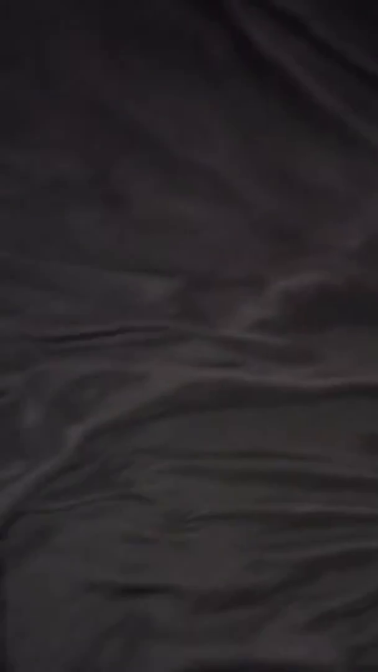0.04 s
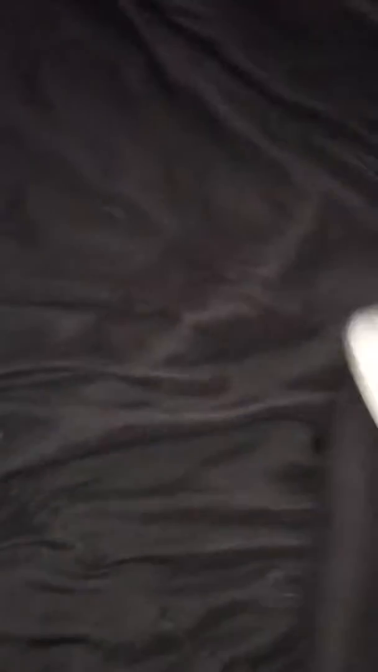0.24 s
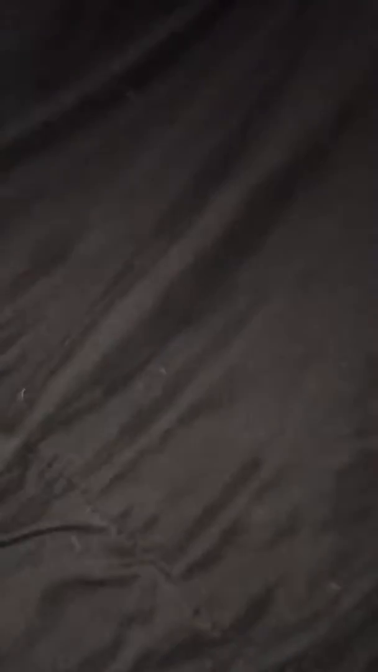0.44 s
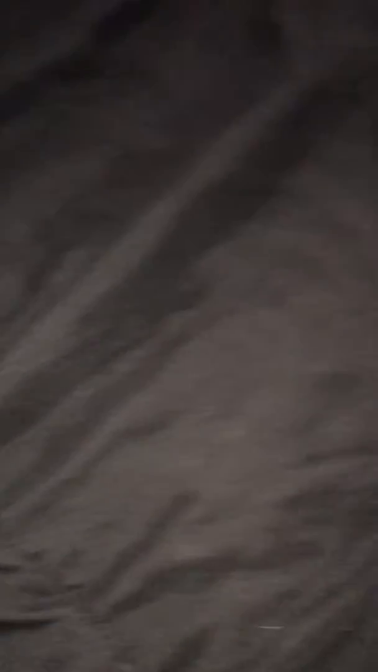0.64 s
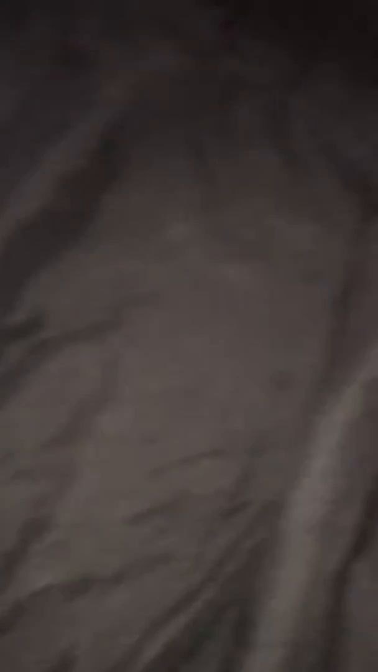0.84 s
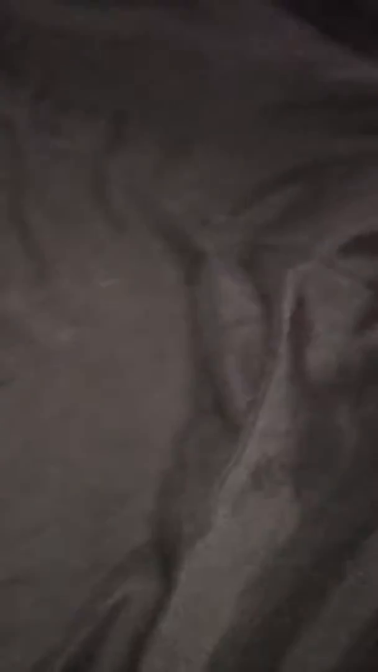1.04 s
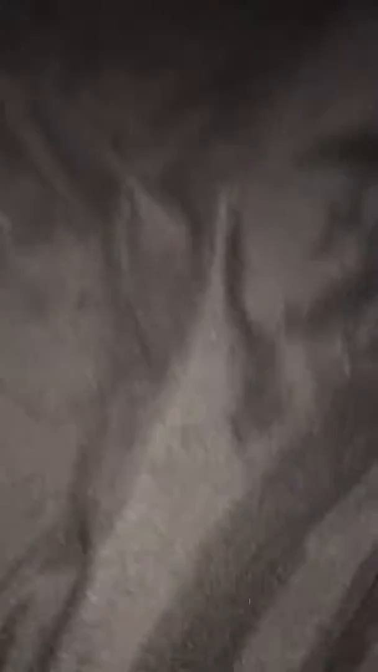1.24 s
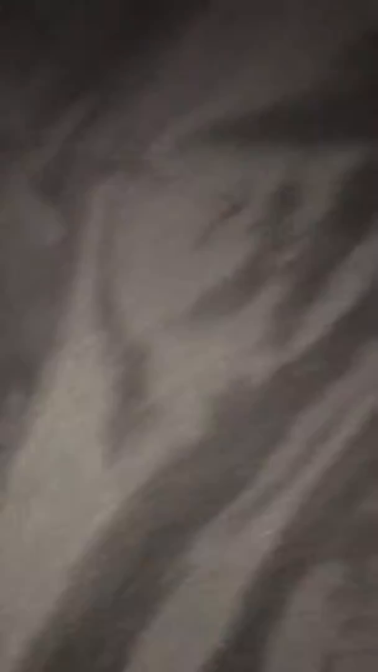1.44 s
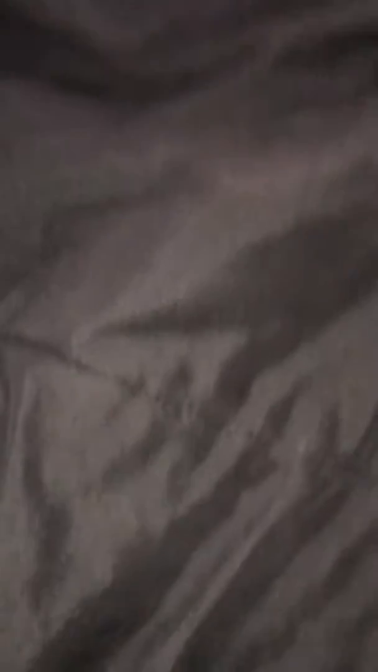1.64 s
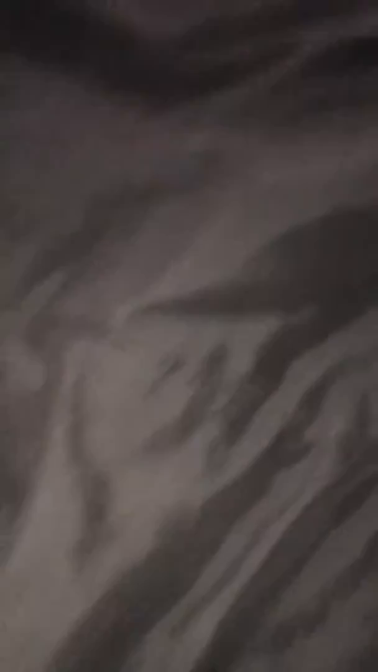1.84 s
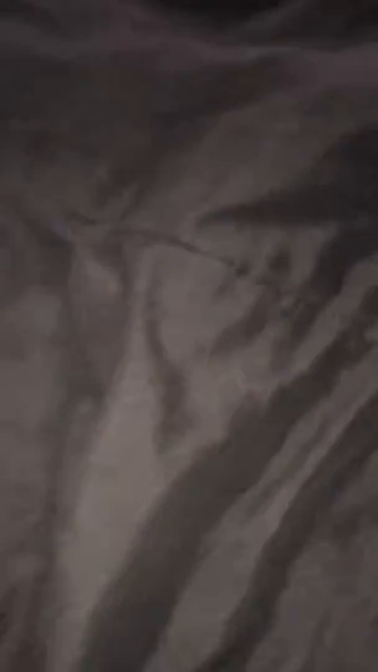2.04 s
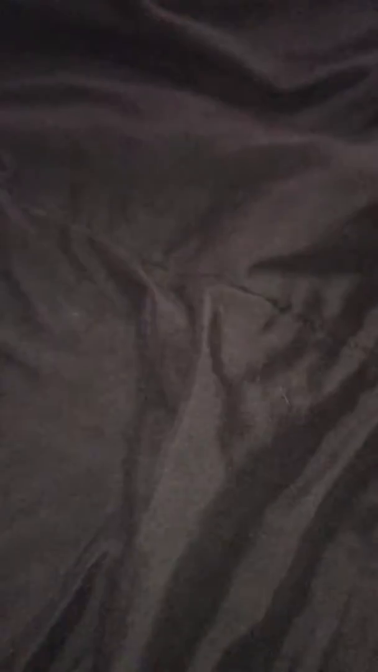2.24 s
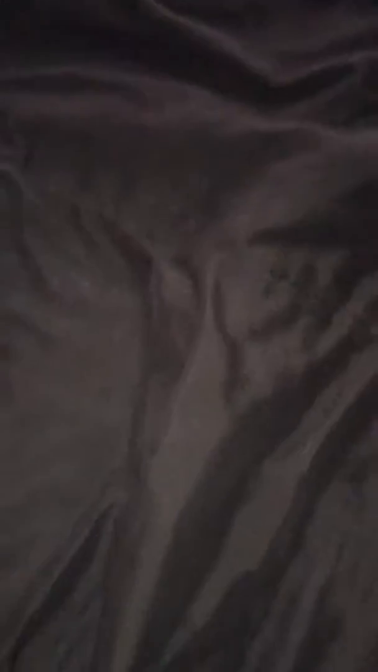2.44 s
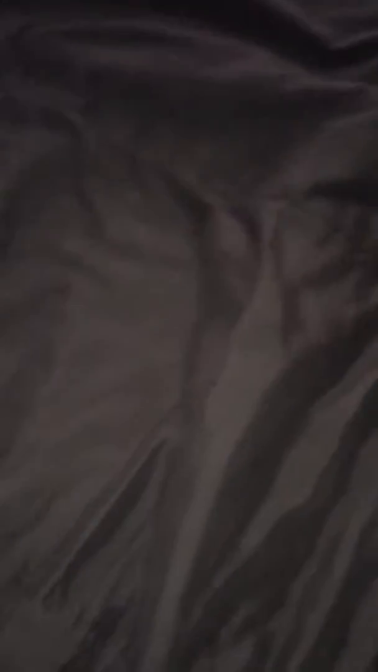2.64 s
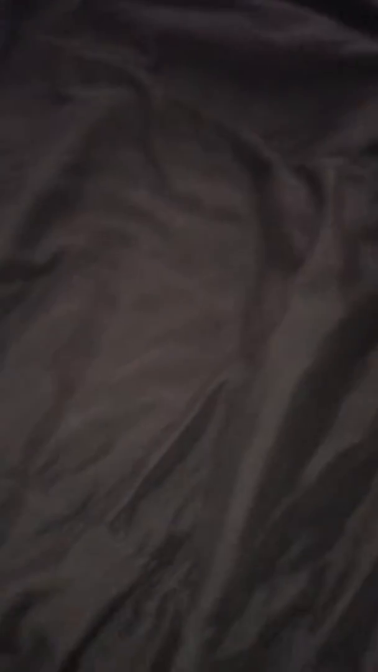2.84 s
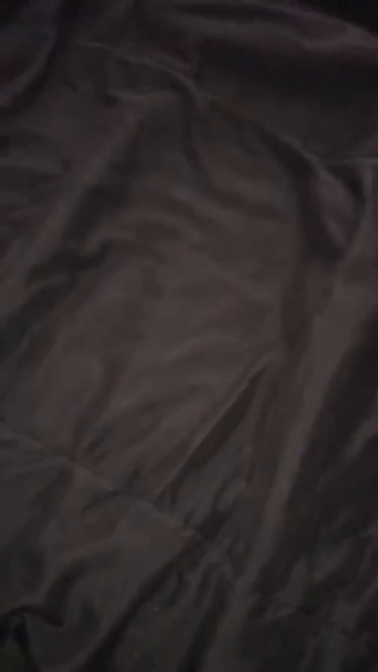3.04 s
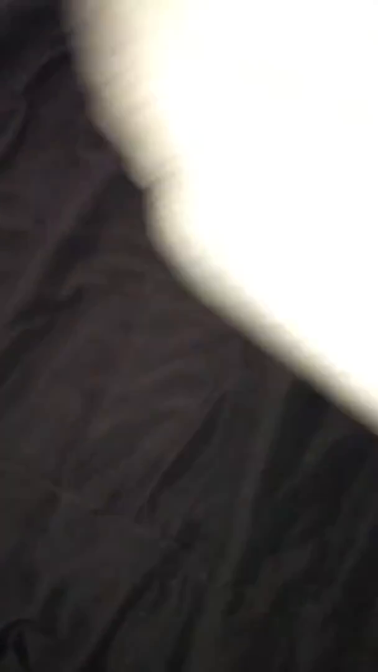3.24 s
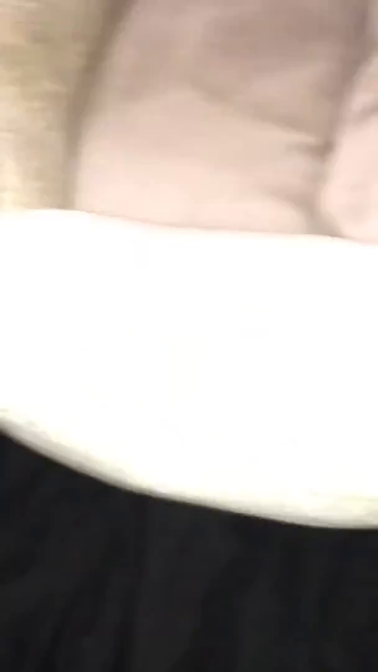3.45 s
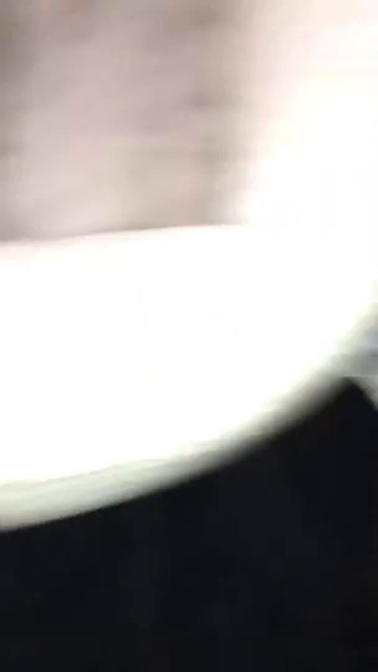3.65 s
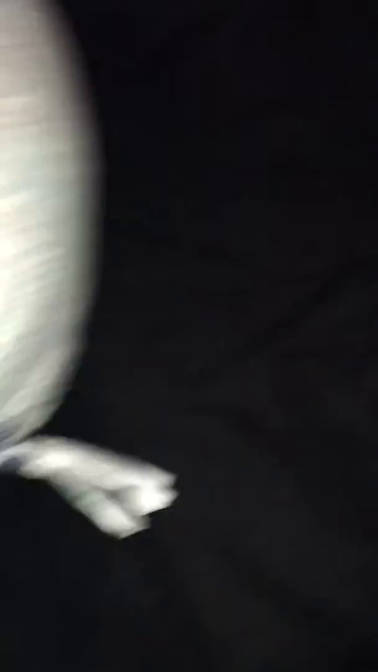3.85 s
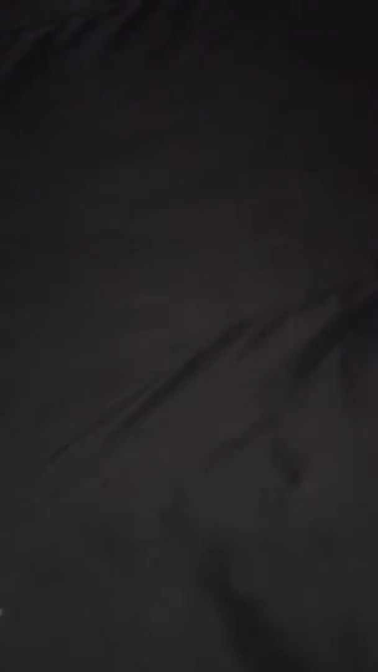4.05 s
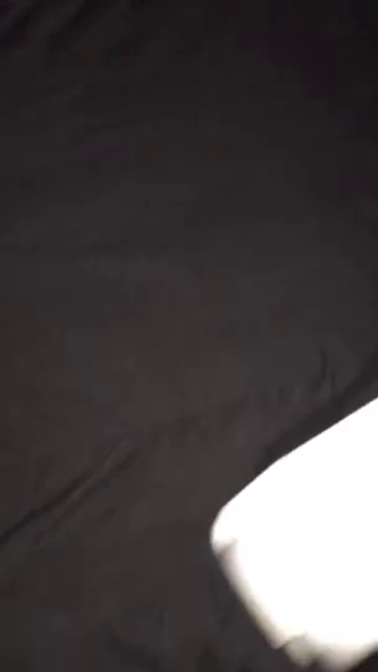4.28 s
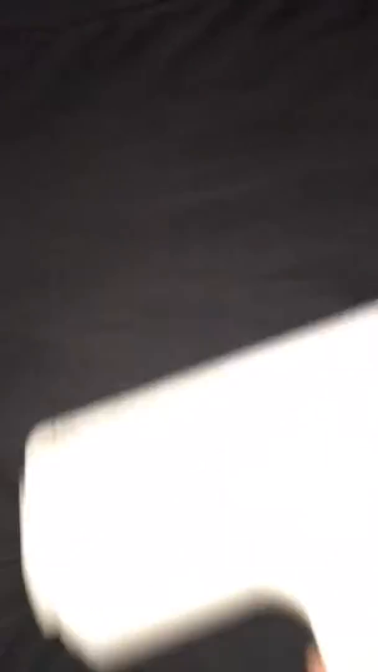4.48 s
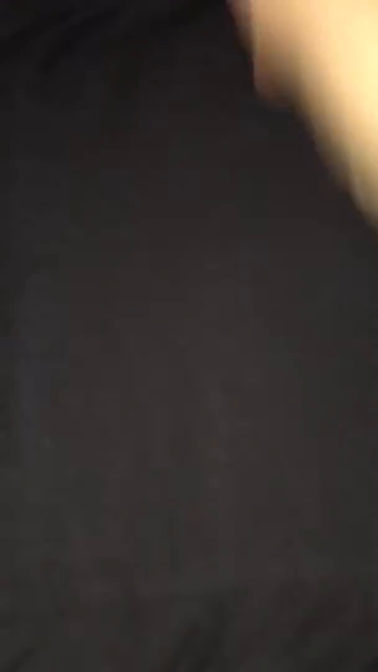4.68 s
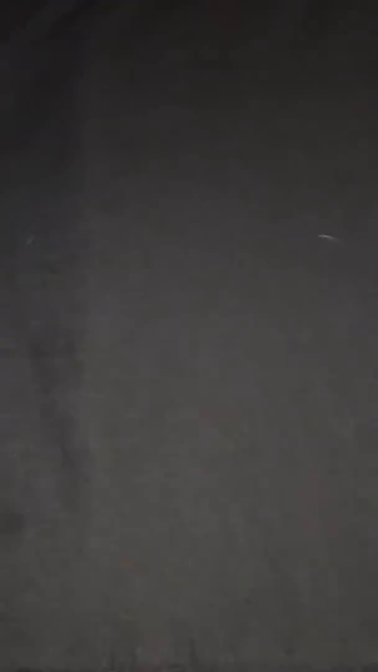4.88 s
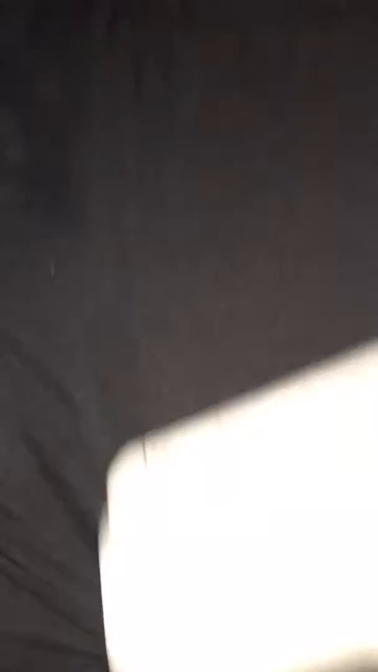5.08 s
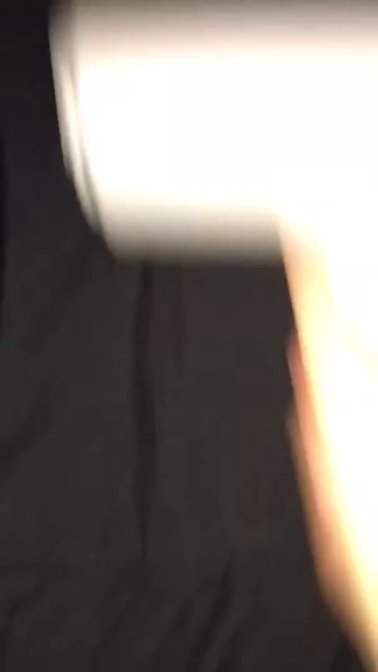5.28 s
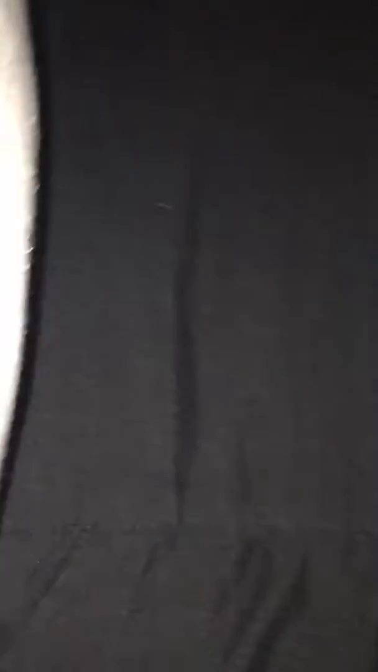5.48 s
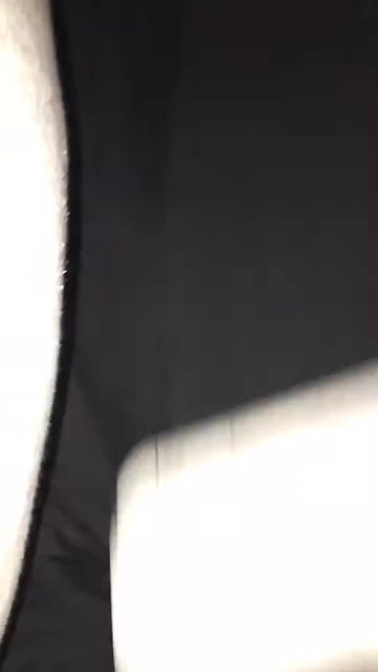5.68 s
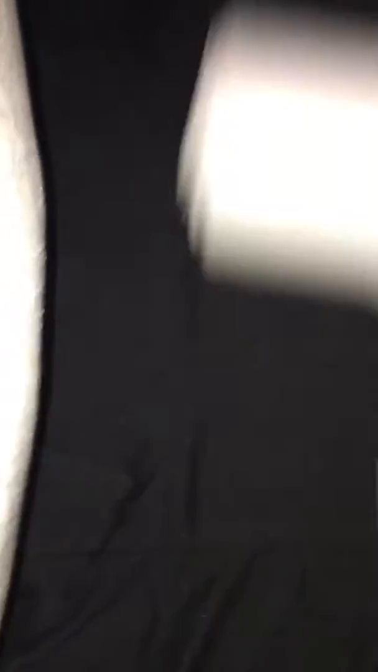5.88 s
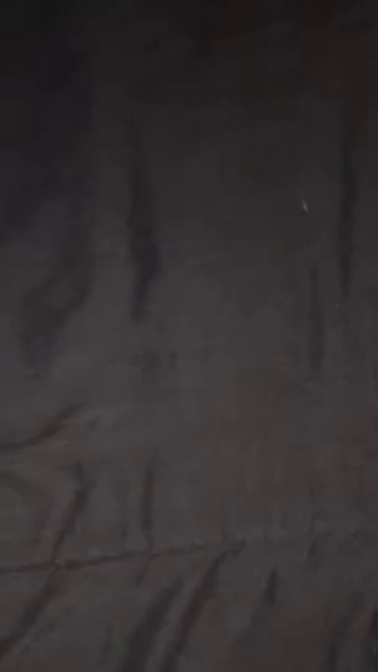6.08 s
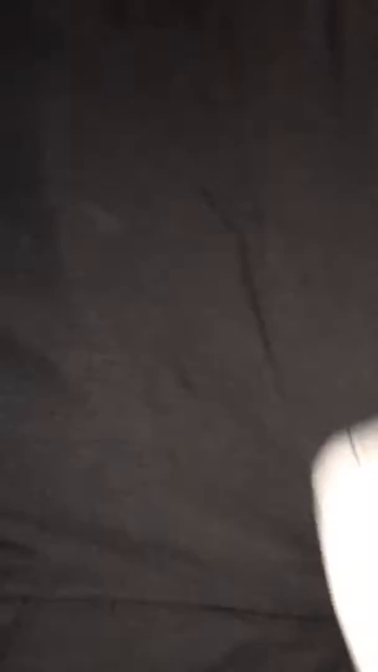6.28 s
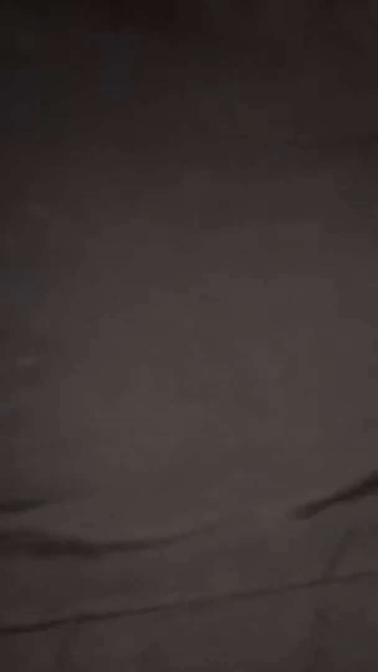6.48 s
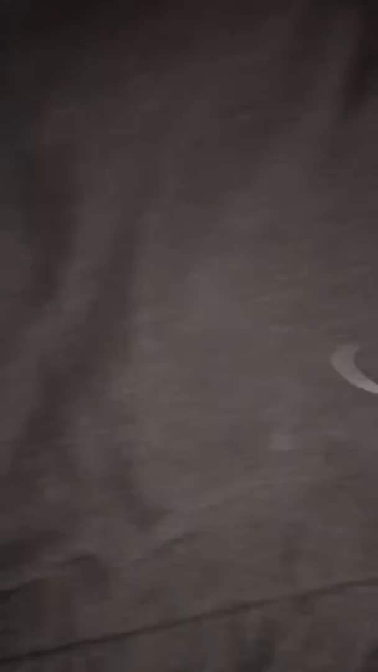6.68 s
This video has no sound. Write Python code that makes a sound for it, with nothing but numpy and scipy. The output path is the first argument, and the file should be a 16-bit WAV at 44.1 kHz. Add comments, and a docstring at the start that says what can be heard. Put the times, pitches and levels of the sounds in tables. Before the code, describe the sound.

Close by, a hand-held lint remover rubs over bed fabric in quick strokes, its roller clacking against the hollow plastic housing at every change of direction. A short scrape interrupts it, leaving only light sheet rustles and muffled bumps for about two seconds. Then the clacking and brushing resume with sharper snaps of cloth. Soft air noise and a low hum fill the quiet bedroom.

```python
"""A plastic pet-hair remover is pushed back and forth over bedding, close up in a quiet bedroom.
At each turn its brush roller flips and clacks against the hollow housing; then bristles hiss over the
weave and the cloth rumbles. Just after two seconds the housing catches and scrapes, and the strokes
pause: the bedding is shifted with whispers and soft bumps. From 4.5 s the strokes return and the folds
snap harder. Soft air noise and an appliance hum lie under it all."""
import sys
import numpy as np
from scipy import signal
from scipy.fft import rfft, irfft, next_fast_len
from scipy.io import wavfile
from scipy.ndimage import uniform_filter1d

SR = 44100
rng = np.random.default_rng(int(sys.argv[2]) if len(sys.argv) > 2 else 0)


def waveform_to_disk(signal):
    """Save audio, clipped to [-1, 1], as 16-bit WAV at the path in sys.argv[1]."""
    frames = np.transpose(np.atleast_2d(signal))
    scaled = np.clip(frames, -1, 1) * 32767
    samples = np.round(scaled).astype(np.int16)
    wavfile.write(sys.argv[1], SR, samples)


N = 296352
T = np.arange(N) / SR

# the roller flips from stop to stop:
# clack_s, swing_ms, tick_db, body_db, wall_db, crack_db, chatter_ms, spot_hz
ROLLER_FLIPS = [(0.23, 75, -48.5, -29, -30.5, -35, 4, 1380), (0.682, 50, -56, -38, -40, -45, 5.9, 1040),
                (1.0051, 47, -54, -22.5, -21.5, -21.5, 1.5, 820), (1.481, 61, -57, -51, -49, -67, 5, 880),
                (1.7654, 66, -48, -34, -29.5, -32, 2.9, 1460),
                (2.034, 10.7, -45, -58, -58, -45, 0.82, 4550),
                (4.5204, 91.4, -39.5, -29, -29, -31, 2.7, 1100),
                (4.9691, 41, -50.5, -32, -35, -34.5, 5.9, 716),
                (5.2915, 27, -52, -19.5, -23.5, -21, 1.23, 694),
                (5.604, 45.5, -45, -28.5, -29.5, -32, 3.6, 2030),
                (5.8807, 43, -46, -22, -21, -22.5, 4.7, 717),
                (6.2078, 37, -47.5, -27.5, -23, -23.5, 2.1, 2130),
                (6.488, 40, -56, -24.5, -21.5, -25.5, 3.9, 1470)]
# ring of the hollow plastic housing: pitch_hz, relative_peak_db, t60_s
HOUSING_MODES = [(189, -1, 0.066), (403.5, -13, 0.057), (508, -2.5, 0.034), (658, 3.5, 0.037),
                 (744, 0.5, 0.064), (833, -3.5, 0.031), (1112, -7, 0.03), (1282, -5, 0.027),
                 (1456, -9.5, 0.05), (1590, -9.5, 0.014), (2214, -8.5, 0.029), (2457, -10.5, 0.086),
                 (3350, -14.5, 0.021), (3817, -16.5, 0.0063), (4000, -21.5, 0.025), (4420, -14, 0.014),
                 (5495, -19.5, 0.013), (6150, -17.5, 0.0095), (6430, -15, 0.0068), (7050, -26, 0.022),
                 (8820, -16.5, 0.015), (9600, -19.5, 0.01), (12300, -29.5, 0.023)]
# dense, quickly damped ring of its walls: frequency_hz, gain_db
CRACK_EQ = [(100, -20.5), (400, 2), (700, -7), (950, -3), (1400, -5.5), (2800, -8), (3700, -6), (6000, -13),
            (7600, -15.5), (9400, -24.5), (10600, -22), (16000, -28)]
# the housing is jolted in the hand: time_s, wall_db, brightness_db, spot_hz
HAND_JOLTS = [(0.34, -37.5, 7, 6300), (0.356, -34, 0, 1350), (0.865, -43, -1.5, 1570),
              (0.916, -49, 14.5, 2130), (1.144, -51.5, 12.5, 9390), (1.493, -49, 1.5, 6420),
              (1.848, -53, 9.5, 1070), (2.43, -59, -0.5, 1750), (2.6092, -41, 0, 2630),
              (2.7903, -55, -8.5, 1310), (2.872, -58.5, -7, 1170), (2.91, -59.5, -4, 1200),
              (3.717, -56, -3.5, 2910), (4.541, -42.5, 6.5, 5900), (4.717, -42.5, -9, 1650),
              (4.7987, -48.5, 9.5, 6260), (5.6845, -39.5, -9, 1800), (5.723, -49, -4, 1010),
              (6.024, -42.5, -2.5, 1030)]
# pushes and pulls over the bed:
# start_s, length_s, hardest_press_fraction, slowing_db_per_s, rumble_db, rub_db, hiss_db
BRUSH_STROKES = [(-0.15, 0.21, 0.58, 11, -39, -48, -48.5), (0.191, 0.42, 0.61, 17, -45, -48.5, -50.5),
                 (0.659, 0.25, 0.78, 0.5, -43, -47, -51.5), (0.98, 0.31, 0.65, 43, -42, -48, -53),
                 (1.454, 0.23, 0.28, -3, -48.5, -52.5, -60), (1.737, 0.15, 0.63, 28, -41, -46.5, -54.5),
                 (2.004, 0.28, 0.3, -3.5, -47.5, -52.5, -55.5), (3.106, 0.21, .3, 4, -55.5, -60, -63.5),
                 (3.31, 0.03, .5, 0, -46, -53, -70), (3.618, 0.06, 0.37, 35, -52.5, -60, -75.5),
                 (3.76, 0.4, 0.69, 6, -60.5, -73, -77), (4.48, 0.38, 0.59, 18, -42, -48, -49),
                 (4.955, 0.23, 0.5, -14, -36, -44, -47), (5.256, 0.24, 0.41, 18, -41, -47, -49.5),
                 (5.591, 0.2, .5, -8, -34.5, -42, -46.5), (5.848, 0.25, 0.63, 24, -38.5, -47, -49),
                 (6.205, 0.2, 0.56, 14, -33, -40.5, -46.5), (6.455, 0.24, 0.53, 13, -40, -46.5, -48.5)]
# tone of a stroke's three layers (cloth, housing, bristles): frequency_hz, gain_db
RUMBLE_EQ = [(25, -30), (55, -2), (110, -3), (180, 0.5), (260, -4.5), (340, -7.5), (480, -14.5),
             (900, -38.5)]
RUB_EQ = [(280, -22), (480, -1), (670, 4), (950, 0.5), (1350, -2), (1750, -5.5), (2150, -1.5), (2800, -15),
          (4000, -30)]
HISS_EQ = [(2000, -3.5), (3300, 1.5), (4400, 0), (5000, -3.5), (6200, -2), (7700, -8), (9300, -4),
           (10500, -11.5), (12400, -7.5), (16000, -18.5)]
# ribs of the weave zip under the bristles: centre_s, length_s, start_hz, end_hz, rms_db
WEAVE_ZIPS = [(0.641, 0.051, 2400, 2700, -55.5), (0.772, 0.19, 4500, 5200, -59.5),
              (0.982, 0.041, 5700, 6000, -58), (2.294, 0.037, 2660, 2720, -48),
              (4.784, 0.15, 4220, 3570, -61), (5.073, 0.088, 4880, 4440, -66),
              (6.297, 0.16, 6760, 6560, -51)]
# folds snapping taut and soft bumps on the bed: centre_s, peak_db, start_hz, end_hz, half_width_ms
FOLD_SNAPS = [(1.177, -36, 424, 220, 6), (2.813, -43.5, 780, 530, 11), (3.321, -48, 897, 400, 8),
              (3.434, -39, 307, 128, 24), (3.627, -44.5, 396, 218, 12.7), (3.935, -45.5, 89, 53.6, 22),
              (3.985, -48, 100.6, 59.5, 22), (4.047, -40, 131.4, 63, 27), (4.064, -38.5, 194, 76.4, 18.3),
              (4.175, -48, 101.5, 60.3, 13), (4.7196, -21, 271, 140, 8.7), (5.426, -27, 720, 170, 4.3),
              (5.6876, -21.5, 1300, 286, 2.65), (5.724, -24.5, 1260, 520, 1.8),
              (5.745, -26, 222, 158, 11.7)]
# the housing catches and scrapes along: start_s, length_s, level_db
HOUSING_SCRAPES = [(2.192, 0.005, -36), (2.202, 0.017, -47), (2.23, 0.025, -42.5), (2.262, 0.06, -41.5)]
# nasal tone of the scraping plastic: frequency_hz, gain_db
SCRAPE_EQ = [(250, -28), (550, -5), (1050, -5), (1340, 5), (1650, -7), (2600, -13.5), (4000, -25),
             (9000, -43)]
# the sheet slides lightly during the pause: start_s, length_s, level_db
SHEET_SLIDES = [(3.08, 0.027, -61.5), (3.115, 0.15, -57), (3.29, 0.084, -59.5), (3.39, 0.015, -58)]
# airy tone of the sheet: frequency_hz, gain_db
SHEET_EQ = [(2000, -16), (4500, -12), (5600, -1), (7500, -5), (9300, -4), (10500, -9), (12500, -4),
            (16000, -11)]
# dark air noise of the room: frequency_hz, gain_db
AIR_EQ = [(15, -41), (25, -15), (58, 1.5), (87, -14.5), (123, -8.5), (145, -24), (326, -26), (363, -11),
          (516, -19), (575, -14.5), (754, -15.5), (1560, -15), (16000, -51.5)]
# hum of a household appliance: pitch_hz, rms_db
APPLIANCE_HUM = [(59.5, -68), (119, -63.5), (371.4, -69.5), (576, -75)]


def roller(lead_s=0.0007):
    """Hero hits: at each turn the roller ticks off one stop, swings over and clacks against the other."""
    out = np.zeros(N)
    tick_balance_db = np.array([-4.5, 0, -11.5])  # body, wall, crack: a dull tick
    for clack_s, swing_ms, tick_db, *levels_db, chatter_ms, spot_hz in ROLLER_FLIPS:
        add(out, clack(levels_db, chatter_ms, spot_hz), clack_s - lead_s)
        tick = clack(tick_db + tick_balance_db, chatter_ms=3.2, spot_hz=1200)
        add(out, tick, clack_s - swing_ms / 1000 - lead_s)
    return out


def clack(levels_db, chatter_ms, spot_hz):
    """A hit rings the housing, with a boost at the struck spot's own pitch."""
    t = T[:SR // 10]
    hz, db, t60_s = np.transpose(HOUSING_MODES)[:, :, None]
    # the grip shifts, so the modes come out a little differently each time
    hz = hz * (1 + 0.008 * rng.standard_normal(hz.shape))
    strength = undb(db + 1.5 * rng.standard_normal(hz.shape)) / t60_s
    strength[1::2] *= -1  # neighbouring modes swing in opposite senses
    ring = np.sum(strength * np.sin(2 * np.pi * hz * t) * decay(t, t60_s), axis=0)
    crack = colour(rng.standard_normal(len(t)) * decay(t, t60_s=0.013), CRACK_EQ)
    housing = unit(ring) + undb(-2) * unit(crack)
    hit = signal.fftconvolve(contacts(t, chatter_ms), housing)[:len(t)]
    hit = hit + signal.lfilter(*signal.iirpeak(spot_hz, Q=6.2, fs=SR), hit)
    return balance_bands(hit, levels_db)


def contacts(t, chatter_ms, ticks_per_s=7000):
    """Force on the housing: one blow, then chatter that builds and dies away, and a small rebound."""
    chatter_s = chatter_ms / 1000
    ticks = rng.standard_normal(len(t)) * (rng.random(len(t)) < ticks_per_s / SR)
    build = 1 - np.exp(-(t / (0.21 * chatter_s)) ** 2)
    chatter = ticks * build * np.exp(-t / chatter_s)
    chatter *= undb(-2) / np.sqrt(np.sum(chatter ** 2) + 1e-12)
    add(chatter, undb([-16]), start_s=rng.uniform(0.006, 0.012))  # the rebound
    # light contacts only tick the walls; the broad main blow alone pumps the air in the cavity
    blow = signal.lfilter(*signal.butter(2, 2500, fs=SR), signal.unit_impulse(len(t)))
    return blow + signal.lfilter(*signal.butter(2, 900, "high", fs=SR), chatter)


def balance_bands(hit, levels_db, crossovers_hz=(1000, 2800), window_s=0.02):
    """Level a hit's body (lows), wall (mids) and crack (highs), each as rms if spread over the window."""
    body, body_and_wall = (signal.sosfiltfilt(signal.butter(4, hz, fs=SR, output="sos"), hit)
                           for hz in crossovers_hz)
    bands = body, body_and_wall - body, hit - body_and_wall
    return sum(undb(db) * band * np.sqrt(window_s * SR / np.sum(band ** 2))
               for db, band in zip(levels_db, bands))


def jolts(lead_s=0.00058):
    """Lighter knocks that favour the walls over the cavity; a harder contact trades body for crack."""
    out = np.zeros(N)
    for time_s, wall_db, brightness_db, spot_hz in HAND_JOLTS:
        levels_db = wall_db + np.array([-7 - brightness_db, 0, -7 + brightness_db])
        add(out, clack(levels_db, chatter_ms=2.6, spot_hz=spot_hz), time_s - lead_s)
    return out


def brushing():
    """The cloth puckers under the head, the housing rubs on it and bristles flick over the weave."""
    *_, rumble_db, rub_db, hiss_db = np.transpose(BRUSH_STROKES)
    grip = undb(wander(70))  # the drag grips and lets go
    rumble = unit(colour(grains(per_s=1500, spread_db=2.5), RUMBLE_EQ))
    rub = shimmer(colour(grains(per_s=2500, spread_db=3), RUB_EQ), depth_db=4, rate_hz=60)
    hiss = unit(colour(grains(per_s=13000, spread_db=3.5), HISS_EQ))
    rumble_gain = stroke_envelope(rumble_db, speed_power=0.9, easing_db=7.6, rest_db=-62, lead_s=0.02)
    rub_gain = stroke_envelope(rub_db, speed_power=0.75, easing_db=4, rest_db=-64.5, lead_s=-0.01)
    hiss_gain = stroke_envelope(hiss_db, speed_power=1.1, easing_db=2, rest_db=-76, lead_s=-0.01)
    cloth = (rumble * rumble_gain + rub * rub_gain) * grip
    bristles = (hiss * grip ** 2 + snags()) * hiss_gain
    return cloth + bristles


def stroke_envelope(levels_db, speed_power, easing_db, rest_db, lead_s):
    """Each stroke speeds up, presses hardest once, slows and creeps into the turn."""
    speed_up_s, slow_down_s, creep_s = 0.03, 0.017, 0.12
    t = T + lead_s
    energy = undb(rest_db) ** 2
    for (start_s, length_s, hardest_press, slowing_db_per_s, *_), db in zip(BRUSH_STROKES, levels_db):
        age_s = t - start_s
        speed = (1 + np.tanh(age_s / speed_up_s)) * (1 + np.tanh((length_s - age_s) / slow_down_s)) / 4
        progress = np.clip(age_s / length_s, 0, 1)
        press_db = -easing_db * (2 * (progress - hardest_press)) ** 2
        slowing_db = slowing_db_per_s * length_s * (progress - 0.5)
        push = speed ** speed_power * undb(press_db - slowing_db)
        creep = undb(-17) * np.exp(-np.abs(age_s - progress * length_s) / creep_s)
        energy = energy + undb(db) ** 2 * (push ** 2 + creep ** 2)
    return np.sqrt(energy)


def snags():
    """Crackle in the hiss: bristles catch on threads and flick free."""
    return undb(-7) * unit(colour(grains(per_s=110, spread_db=2.5), CRACK_EQ))


def zips(blur=0.43):
    """Threads pass at a rate set by the speed of the hand; their uneven spacing blurs the pitch."""
    out = np.zeros(N)
    for centre_s, length_s, start_hz, end_hz, rms_db in WEAVE_ZIPS:
        n = int(length_s * SR)
        phase = 2 * np.pi * np.cumsum(np.linspace(start_hz, end_hz, n)) / SR
        flutter = uniform_filter1d(rng.standard_normal((2, n)), int(SR / (blur * start_hz)))
        sweep = flutter[0] * np.sin(phase) + flutter[1] * np.cos(phase)
        add(out, undb(rms_db) * unit(np.hanning(n) * sweep), centre_s - length_s / 2)
    return out


def folds(crease_rad=0.6):
    """A ripple runs through the cloth: short waves arrive first, so each snap falls in pitch."""
    out = np.zeros(N)
    for centre_s, peak_db, start_hz, end_hz, half_width_ms in FOLD_SNAPS:
        half_width_s = half_width_ms / 1000
        offset = np.arange(-2 * half_width_s, 2 * half_width_s, 1 / SR) / half_width_s
        pitch_hz = end_hz + (start_hz - end_hz) * (1 - np.tanh(2 * offset + 1)) / 2
        phase = 2 * np.pi * np.cumsum(pitch_hz) / SR
        phase += crease_rad * wander(end_hz)[:len(offset)]  # creases make the fall uneven
        snap = np.exp(-2 * offset ** 2) * np.sin(phase)
        add(out, undb(peak_db) * snap, centre_s - 2 * half_width_s)
    return out


def scrape():
    """Coarse slips ring one broad resonance of the plastic."""
    slips = colour(grains(per_s=1100, spread_db=1.5), SCRAPE_EQ)
    return slide(slips, HOUSING_SCRAPES, attack_s=0.0024, release_s=0.0053, fade_db=0.5)


def sheet():
    """Fine slips make the sheet whisper."""
    slips = colour(grains(per_s=10000, spread_db=4), SHEET_EQ)
    return slide(slips, SHEET_SLIDES, attack_s=0.0085, release_s=0.008, fade_db=9)


def bedroom_echo(x, t60_s=0.11, build_s=0.0064, dull_hz=3500, send_db=-15.5):
    """A faint, short, dull echo from the walls."""
    t = T[:SR // 2]
    tail = rng.standard_normal(len(t)) * decay(t, t60_s) * (1 - np.exp(-(t / build_s) ** 2))
    tail = signal.lfilter(*signal.butter(1, dull_hz, fs=SR), tail / np.sqrt(np.sum(tail ** 2)))
    return undb(send_db) * signal.fftconvolve(x, tail)[:N]


def room_tone(air_db=-59.5):
    """Soft air noise and the wavering hum of a household appliance."""
    air = unit(colour(rng.standard_normal(N), AIR_EQ)) * undb(air_db + 1.3 * wander(5.7))
    hum = np.zeros(N)
    for pitch_hz, rms_db in APPLIANCE_HUM:
        gain = np.sqrt(2) * undb(rms_db + 2.5 * wander(7))
        hum += gain * np.sin(2 * np.pi * pitch_hz * T + 0.6 * wander(8.2))
    return air + hum


def slide(slips, cues, attack_s, release_s, fade_db):
    """Gate a stick-slip texture into short slides: each starts quickly, fades and stops."""
    gain = np.zeros(N)
    for start_s, length_s, level_db in cues:
        age_s = T - start_s
        gate = np.clip(age_s / attack_s, 0, 1) * np.exp(-np.maximum(age_s - length_s, 0) / release_s)
        gain += gate * undb(level_db - fade_db * np.clip(age_s / length_s, 0, 1))
    return shimmer(slips, depth_db=2.5, rate_hz=39) * gain


def shimmer(x, depth_db, rate_hz):
    """As the contact patch moves, neighbouring half-octaves swell and fade on their own."""
    spectrum = rfft(x)
    hz = np.arange(len(spectrum)) * SR / N
    half_octaves = 2 * np.log2(np.maximum(hz, 250) / 250)
    bands = (irfft(spectrum * np.maximum(1 - np.abs(half_octaves - k), 0), N) for k in range(14))
    return unit(sum(band * undb(depth_db * wander(rate_hz)) for band in bands))


def grains(per_s, spread_db):
    """Tiny slips at random moments, most weak and a few strong."""
    slips = (rng.random(N) < per_s / SR) * rng.choice([-1, 1], N)
    strength_db = spread_db * np.minimum(rng.exponential(size=N), np.log(100))
    return unit(slips * undb(strength_db))


def wander(rate_hz):
    """Smooth random modulation at rms 1."""
    hold = int(SR / rate_hz)
    steps = np.repeat(rng.standard_normal(N // hold + 1), hold)[:N]
    return unit(uniform_filter1d(steps, hold))


def colour(x, eq):
    """Minimum-phase EQ through (frequency_hz, gain_db) points."""
    hz, db = np.transpose(eq)
    n = 2 * next_fast_len(len(x))
    bins_hz = np.maximum(np.arange(n // 2 + 1) * SR / n, 1)
    gain = undb(np.interp(np.log(bins_hz), np.log(hz), db))
    cepstrum = irfft(np.log(gain))
    cepstrum[1:n // 2] *= 2  # folded forward, so nothing rings ahead of a transient
    cepstrum[n // 2 + 1:] = 0
    return irfft(rfft(x, n) * np.exp(rfft(cepstrum)))[:len(x)]


def decay(t, t60_s):
    """Fall by 60 dB every t60_s."""
    return np.exp(-np.log(1000) * t / t60_s)


def undb(db):
    """Decibels to gain."""
    return 10 ** (np.asarray(db) / 20)


def unit(x):
    """Scale to rms 1."""
    return x / np.sqrt(np.mean(x ** 2) + 1e-20)


def add(out, x, start_s):
    """Mix x into out from the given time on."""
    i = max(int(start_s * SR), 0)
    out[i:i + len(x)] += x[:len(out) - i]


def scene():
    """The tool and the bedding up close, with the room behind them, in mono."""
    near = roller() + jolts() + brushing() + zips() + folds() + scrape() + sheet()
    return (near + bedroom_echo(near) + room_tone())[None]


def record(dry, ceiling=0.96, top_hz=16000):
    """Round off the sharpest peaks and cut the extreme treble."""
    rounded = ceiling * np.tanh(dry / ceiling)
    return signal.sosfilt(signal.ellip(10, 0.2, 80, top_hz, fs=SR, output="sos"), rounded)


dry = scene()
out = record(dry)
waveform_to_disk(out)
```